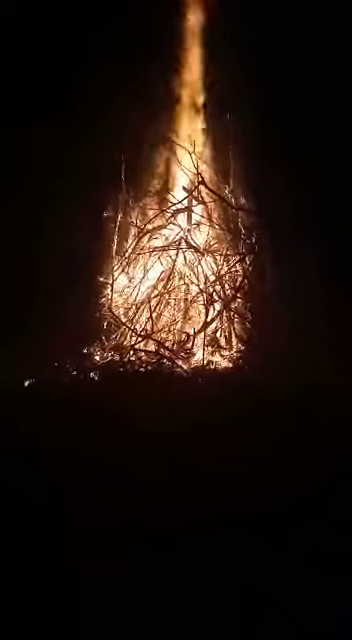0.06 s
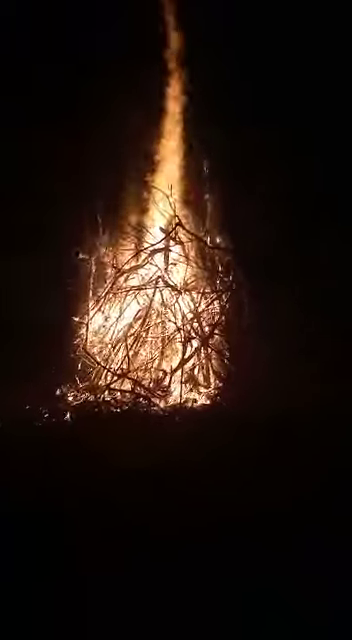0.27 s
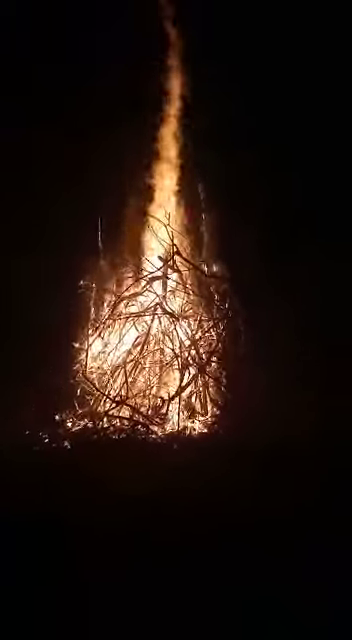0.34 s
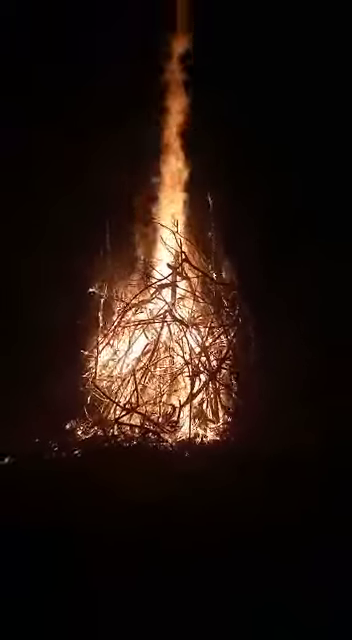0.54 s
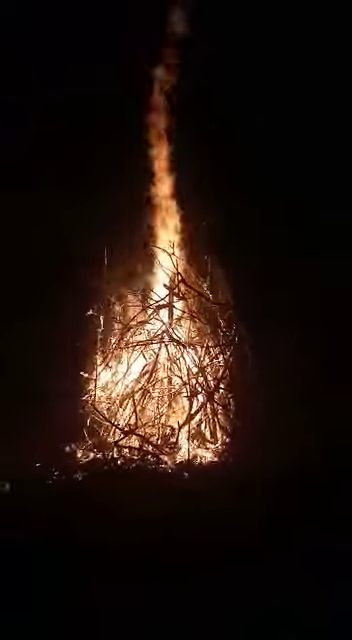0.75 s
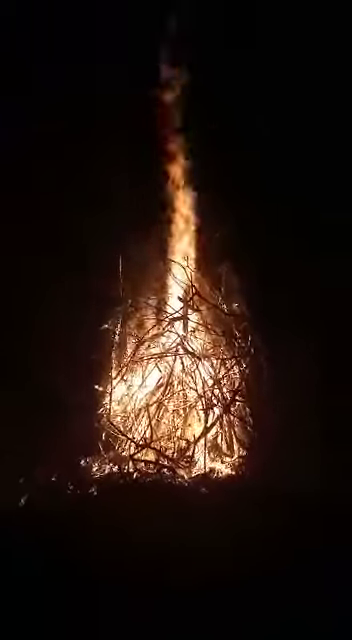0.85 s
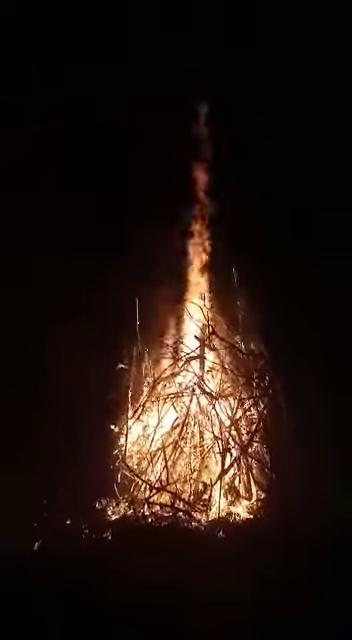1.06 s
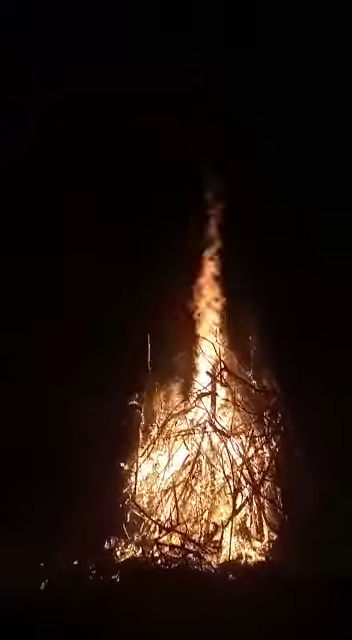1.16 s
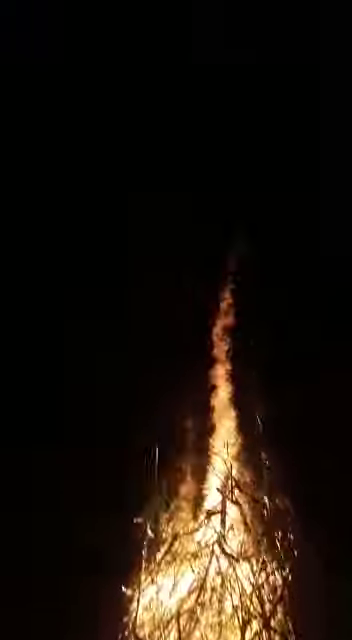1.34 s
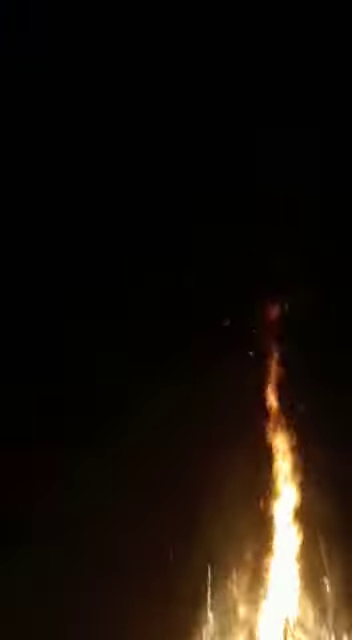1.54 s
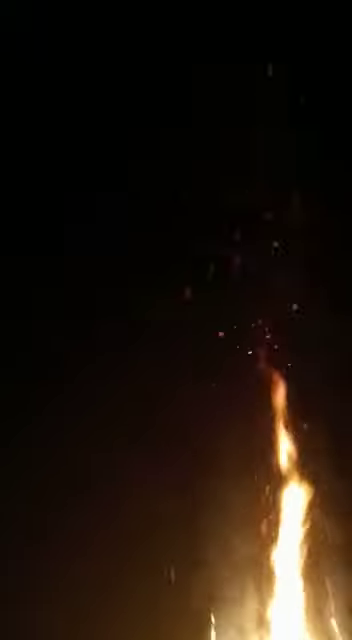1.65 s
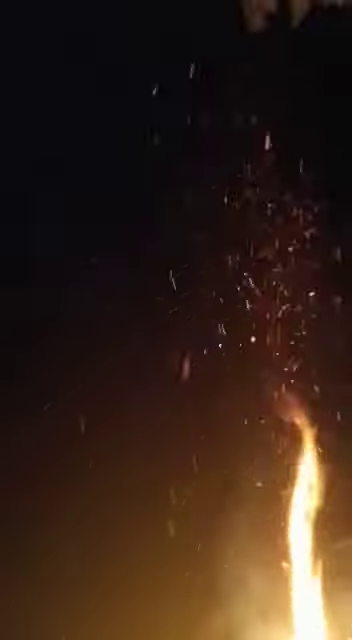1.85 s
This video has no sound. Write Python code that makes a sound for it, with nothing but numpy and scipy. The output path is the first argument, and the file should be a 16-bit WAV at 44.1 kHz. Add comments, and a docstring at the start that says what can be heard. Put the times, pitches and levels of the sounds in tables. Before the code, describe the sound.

Brushwood fire crackling outdoors, briefly muffled by microphone handling, then bright with dense snapping twigs

```python
"""A brushwood bonfire burns: flames rumble, damp wood sizzles and twigs snap.
Early on, rubs and knocks on the microphone thump and scrape, and covering it dulls the fire.
Sap spits in short jets; later, steam squeezes out of the wood in two faint whistles.
Flames and hiss are coloured noise, snaps and spits are shaped ringing bursts, whistles are wavering
narrow bands; rubs are two noises under one envelope and knocks are short decaying sines."""
import sys
import numpy as np
from scipy import signal
from scipy.fft import rfft, irfft
from scipy.io import wavfile
from scipy.ndimage import uniform_filter1d

SR = 44100
rng = np.random.default_rng(int(sys.argv[2]) if len(sys.argv) > 2 else 0)


def put_to_file(sound):
    """Save the sound as 16-bit audio at rate SR, in the file named by the first command-line argument."""
    columns = np.atleast_2d(sound).T  # one column per channel
    safe = np.clip(columns, -1, 1)
    whole_steps = np.round(safe * 32767)
    wavfile.write(sys.argv[1], SR, whole_steps.astype(np.int16))


N = 83790
TIME = np.arange(N) / SR
BURST_TIME = np.arange(2048) / SR
CRACK_BAND = signal.butter(3, [4600, 8600], "band", fs=SR)
BODY_BAND = signal.butter(2, [1500, 4000], "band", fs=SR)


def from_db(db):
    """Decibels to amplitude gain."""
    return 10 ** (np.asarray(db) / 20)


def rms_one(x):
    """Scale to unit rms."""
    return x / np.sqrt(np.mean(x ** 2) + 1e-20)


def in_time(rows):
    """Interpolate (time_s, value) rows to every sample."""
    return np.interp(TIME, *np.transpose(rows))


def filtered(x, hz, kind, order=2):
    """Butterworth filter."""
    sos = signal.butter(order, np.clip(hz, 10, .45 * SR), kind, fs=SR, output="sos")
    return signal.sosfilt(sos, x)


def noise(spectrum, size=N):
    """Unit-rms noise coloured by (frequency_hz, density_db) rows, interpolated over log frequency."""
    hz, db = np.transpose(spectrum)
    bin_hz = np.fft.rfftfreq(size, 1 / SR)
    gain = from_db(np.interp(np.log(bin_hz + 1), np.log(hz), db))
    return rms_one(irfft(rfft(rng.standard_normal(size)) * gain, size))


def drift(rate_hz):
    """Unit-rms random wander: white noise through a two-pole low-pass."""
    r = np.exp(-2 * np.pi * rate_hz / SR)
    wander = signal.lfilter([1], [1, -2 * r, r * r], rng.standard_normal(N + SR))
    return rms_one(wander[SR:])  # first second discarded: filter settling


def add(out, start_s, sound):
    """Mix a sound in at a time."""
    i = int(np.clip(start_s * SR, 0, N - 1))
    out[i:i + len(sound)] += sound[:N - i]


def flames():
    """Rumble of the flame column: bass-heavy noise with a fluttering level."""
    # flame colour: frequency_hz, density_db
    roar = [(25, -14), (45, -13.5), (70, 0.5), (105, 1), (170, -5.5), (260, -4.5), (400, -13.5), (600, -11),
            (780, -14), (950, -19.5), (1400, -20.5), (2200, -23.5), (4000, -29), (9000, -35)]
    level_db, flutter_db = -38.5, 1.5
    return noise(roar) * from_db(level_db + flutter_db * drift(24))


def hiss():
    """Sizzle of damp wood: treble noise with a fast flickering level."""
    # sizzle colour: frequency_hz, density_db
    sizzle = [(1500, -3.5), (2800, -2.5), (4300, -6), (5500, -1.5), (6600, 6), (8200, -3), (11000, -5.5),
              (16000, -5.5)]
    base_db, flutter_db = -46, 1.66
    return noise(sizzle) * from_db(base_db + flutter_db * drift(99))


def burst(envelope, length_s, ring_hz, body_db, edge_db):
    """Gas bursting from wood: ringing crack, woody body and bright edge, scaled for nominal length."""
    # bright edge colour: frequency_hz, density_db
    edge_colour = [(8000, -23), (10000, 3.5), (13000, 3.5), (20000, -4.5)]
    ring_width_hz, crack_db, body_trim_db, edge_trim_db = 1500, -4, -1.5, -8
    ring, crack, body = rng.standard_normal((3, len(BURST_TIME))) * envelope
    r = np.exp(-np.pi * ring_width_hz / SR)
    poles = [1, -2 * r * np.cos(2 * np.pi * ring_hz / SR), r * r]
    ring = rms_one(signal.lfilter([1, 0, -1], poles, ring))
    crack = rms_one(signal.lfilter(*CRACK_BAND, crack))
    body = rms_one(signal.lfilter(*BODY_BAND, body))
    edge = rms_one(noise(edge_colour, size=len(BURST_TIME)) * envelope)
    sound = rms_one(ring + from_db(crack_db) * crack)
    sound = sound + from_db(body_db + body_trim_db) * body
    sound = sound + from_db(edge_db + edge_trim_db) * edge
    return sound * np.sqrt(length_s / BURST_TIME[-1])


def snap(ring_hz, body_db, edge_db, fade_s):
    """One fracture: sudden onset, fast decay and a faint tail scattered by the pile."""
    tail_db, tail_s = -24, .004
    envelope = np.exp(-BURST_TIME / fade_s) + from_db(tail_db) * np.exp(-BURST_TIME / tail_s)
    return burst(envelope, .002, ring_hz, body_db, edge_db)


def crackles():
    """Small fractures at random times all through the pile, each with its own size and colour."""
    rate_per_s, floor_db, spread_db, range_db = 150, -48, 4.5, 12
    centre_hz, body_centre_db, edge_centre_db, fade_s = 7360, -15, -2, 0.00092
    out = np.zeros(N)
    for when, size, pitch, body, edge in rng.random((int(rate_per_s * N / SR), 5)):
        # exponential spread in dB: mostly small, few large
        db = floor_db + min(-spread_db * np.log(1 - size), range_db)
        ring_hz = centre_hz * 2 ** (.7 * (pitch - .5))
        body_db = body_centre_db + 12 * (body - .5)
        edge_db = edge_centre_db + 12 * (edge - .5)
        add(out, when * N / SR, from_db(db) * snap(ring_hz, body_db, edge_db, fade_s))
    return out


def snaps():
    """Twigs snapping: the loud single fractures."""
    # snaps, levels before trim, body and edge re level:
    # start_s, level_db, ring_hz, body_db, edge_db, fade_s
    snap_rows = [(0.0628, -31.5, 4770, 0.5, 8, 0.0024), (0.0851, -35, 8900, 0.5, 13, 0.00088),
                 (0.1107, -28.5, 4650, -3, 3, 0.0012), (0.5261, -42, 6000, 14, -20, 0.00041),
                 (0.5459, -32, 6100, -13, -20, 0.0005), (0.5545, -35.5, 5860, 6, -24, 0.0011),
                 (0.728, -23.5, 6430, -2, -27, 0.0005), (0.7469, -24.5, 6300, -11, -21, 0.00035),
                 (0.7635, -20.5, 6040, -7.5, -22, 0.0022), (0.8272, -46, 5800, 8, -15, 0.00067),
                 (0.8765, -18.5, 7800, -37, 0, 0.0024), (0.8844, -31, 6340, -26, -18, 0.00057),
                 (0.9185, -36, 6600, -25, 13, 0.00043), (0.9414, -43, 6300, -22, 22, 0.0004),
                 (0.9531, -32, 6400, -12, -6, 0.00077), (0.989, -26, 6660, -5.5, 12.5, 0.00032),
                 (1.018, -22.5, 6700, -5.5, -12, 0.00061), (1.0741, -29.5, 6800, -21, 11.5, 0.00068),
                 (1.0943, -40, 7650, 2, 14, 0.0003), (1.1141, -33, 5870, -20, 5, 0.0004),
                 (1.1392, -23.5, 6440, -32, 7.5, 0.0016), (1.1579, -30, 6440, -1, -10, 0.0007),
                 (1.1785, -22.5, 6400, -21, 9, 0.0003), (1.208, -34, 6400, -3, 9, 0.0003),
                 (1.2571, -23, 7200, -9, 5, 0.00055), (1.3065, -28.5, 6600, -26, 7, 0.00054),
                 (1.3138, -29, 6900, -8, 6, 0.0014), (1.3301, -23.5, 9700, -29, -13, 0.00019),
                 (1.3518, -22.5, 7400, -10.5, -9, 0.0016), (1.3631, -25, 6950, -23, -15, 0.00043),
                 (1.4071, -19.5, 6900, -10.5, 4.5, 0.00028), (1.4361, -35, 5670, -18, -12, 0.0005),
                 (1.4424, -23, 9500, -22, -14, 0.00012), (1.5016, -30, 6640, -15, -1, 0.00021),
                 (1.5079, -31, 6240, -9, -11, 0.00048), (1.5146, -28.5, 8500, -7, -12, 0.00065),
                 (1.5296, -30, 7700, -23, -3, 0.0004), (1.5636, -24.5, 7750, -24, 5, 0.00065),
                 (1.57, -25.5, 7900, -24, -23, 0.0004), (1.6154, -26.5, 7850, -34, -1, 0.0006),
                 (1.6226, -30, 7600, -21, -3, 0.00054), (1.6409, -33.5, 8800, -5, 9, 0.0006),
                 (1.6876, -30, 8000, -5, -12, 0.0006), (1.7146, -25, 7800, -5.5, -13, 0.00098),
                 (1.739, -28.5, 7700, -3, 6, 0.00055), (1.7646, -33, 7750, -10, 8, 0.0015),
                 (1.8339, -25, 6860, -30, 1, 0.00026), (1.8447, -35, 7600, -20, 10, 0.00019)]
    trim_db = -4.05
    out = np.zeros(N)
    for start_s, db, ring_hz, body_db, edge_db, fade_s in snap_rows:
        add(out, start_s, from_db(db + trim_db) * snap(ring_hz, body_db, edge_db, fade_s))
    return out


def covered(x):
    """Covering the microphone: treble drops most, bass least, the topmost band on its own curve."""
    # cover depth: time_s, treble_loss_db
    cover = [(0, -1), (.22, -10), (.27, 44), (.3, 32), (.355, 34), (.375, 6), (.45, 36), (.5, 4.5),
             (.565, 21.5), (.59, 0), (1.9, -1)]
    # topmost treble, last to return: time_s, level_db
    top_level = [(0, -2.5), (.2, -0.5), (.26, -20), (.3, -39), (.355, -47), (.375, -41), (.5, -35),
                 (.57, -26), (.62, -7.5), (.72, -4.5), (.85, 0), (1.9, 1.5)]
    split_hz, bass_share, top_split_hz = 1620, 0.1, 6850
    loss_db = in_time(cover)

    def split(sound, hz, order):
        """Low and high bands, each filtered twice so that the halves align."""
        return [filtered(filtered(sound, hz, kind, order), hz, kind, order) for kind in ("low", "high")]

    bass, rest = split(x, split_hz, 2)
    treble, top = split(rest, top_split_hz, 4)
    out = bass * from_db(-bass_share * loss_db)
    out = out + treble * from_db(-loss_db)
    return out + top * from_db(in_time(top_level))


def with_ground(x):
    """Direct sound plus a duller ground reflection, its delay growing as the microphone moves."""
    # reflection path: time_s, delay_ms
    ground_delay = [(0, 1.52), (.7, 1.57), (1.3, 1.656), (1.9, 2.05)]
    share, cut_hz = 0.28, 3700
    dull = filtered(x, cut_hz, "low", order=1)
    echo = np.interp(TIME - in_time(ground_delay) / 1000, TIME, dull)
    return x + share * echo


def rubs():
    """Rubs on the microphone: low thud and grainy scrape under one envelope."""
    # rubs: start_s, attack_s, hold_s, release_s, thud_db, scrape_db
    rub_rows = [(0.173, 0.043, .004, .008, -31, -27), (0.22, 0.0063, 0.033, 0.021, -15.5, -18.5),
                (.366, 0.0022, 0.016, 0.012, -14.5, -23), (0.397, 0.0067, 0.035, 0.029, -17, -26),
                (0.459, 0.0057, 0.0057, .012, -21, -29), (0.563, 0.02, 0.0022, 0.0095, -22, -24.5)]
    # thud colour: frequency_hz, density_db
    thud_colour = [(25, -3), (60, -3.5), (120, 1.5), (220, -3), (350, -1.5), (540, -5.5), (750, -11.5),
                   (1100, -41), (2000, -26), (5000, -57.5)]
    # scrape colour: frequency_hz, density_db
    scrape_colour = [(200, 2.5), (500, -7), (900, 2.5), (1500, -3), (2200, -8), (3200, -17), (4700, -25),
                     (7000, -38.5), (12000, -102)]
    grain_db = 1.2
    out = np.zeros(N)
    thud = noise(thud_colour)
    scrape = rms_one(noise(scrape_colour) * from_db(grain_db * drift(110)))
    thud = thud / np.sqrt(uniform_filter1d(thud ** 2, size=700))  # evens out the running level
    for start_s, attack_s, hold_s, release_s, thud_db, scrape_db in rub_rows:
        rise = np.clip((TIME - start_s) / attack_s, 0, 1)
        fall_age = np.maximum(TIME - start_s - attack_s - hold_s, 0)
        envelope = rise * np.exp(-(fall_age / release_s) ** 2)
        out += envelope * (from_db(thud_db) * thud + from_db(scrape_db) * scrape)
    return out


def knocks():
    """Soft knocks on the microphone housing: fast-decaying low sines."""
    # knocks, level before envelope: start_s, level_db, pitch_hz
    knock_rows = [(.284, -9.5, 111), (.326, -16.5, 104), (0.378, -4, 65), (.408, -6, 67.4),
                  (.471, -9.5, 89), (0.588, -10.5, 58.4)]
    fade_s, attack_s = 0.0059, 0.0019
    out = np.zeros(N)
    for start_s, db, hz in knock_rows:
        age = np.maximum(TIME - start_s, 0)
        envelope = (1 - np.exp(-age / attack_s)) * np.exp(-age / fade_s)
        out += from_db(db) * envelope * np.sin(2 * np.pi * hz * age)
    return out


def spits():
    """Jets of sap: bursts that hold for some milliseconds, then die."""
    # jets, level before trim, edge re level: start_s, length_s, level_db, edge_db
    spit_rows = [(.588, .018, -33, -22), (.6305, .01, -28, -16), (.708, .007, -37, -6),
                 (.985, .01, -31, -5), (1.016, .01, -29, -12), (1.074, .007, -33, -3),
                 (1.443, .008, -37, -4), (1.467, .007, -34, -8), (1.479, .005, -35, -5),
                 (1.566, .011, -32, -5), (1.583, .012, -36, 7)]
    trim_db, ring_hz, body_db, release_s = 1, 6300, -15, .0015
    out = np.zeros(N)
    for start_s, length_s, db, edge_db in spit_rows:
        envelope = np.exp(-np.maximum(BURST_TIME - length_s, 0) / release_s)
        add(out, start_s, from_db(db + trim_db) * burst(envelope, length_s, ring_hz, body_db, edge_db))
    return out


def whistles():
    """Steam through a crack: a narrow, wavering band that glides up, swells and fades."""
    # whistles: start_s, length_s, pitch_hz, rise_hz, level_db
    whistle_rows = [(1.16, 0.096, 1338, 7.1, -43.5), (1.66, 0.257, 2400, 127.4, -44.5)]
    width_hz, waver = 110, .025  # waver: rms fraction of pitch
    out = np.zeros(N)
    for start_s, length_s, hz, rise_hz, db in whistle_rows:
        progress = np.clip((TIME - start_s) / length_s, 0, 1)
        pitch_hz = (hz + rise_hz * progress) * (1 + waver * drift(13.3))
        phase = 2 * np.pi * np.cumsum(pitch_hz) / SR
        band = drift(width_hz) * np.sin(phase) + drift(width_hz) * np.cos(phase)
        swell = np.sqrt(np.abs(np.sin(np.pi * progress)))
        out += from_db(db) * swell * band
    return out


def scene():
    """Fire heard through the cover, snaps past it, ground reflection, then microphone handling; mono."""
    # liveliness of hiss and crackles: time_s, gain_db
    vigour = [(0, -1.5), (.14, -3), (.2, 0.5), (.6, 12), (.66, 2), (.8, 2.5), (1.05, 3), (1.23, 2.5),
              (1.275, -5), (1.32, 0.5), (1.6, -0.5), (1.9, -1.5)]
    bed = flames() + whistles() + from_db(in_time(vigour)) * (hiss() + crackles())
    fire = covered(bed + spits()) + snaps()
    return (with_ground(fire) + rubs() + knocks())[None]


def record(dry):
    """Microphone: port resonance lifts the very top; deepest bass and all above the cut-off go."""
    port_hz, port_width_hz, port_db = 15150, 1300, 9
    low_cut_hz, cutoff_hz = 58, 15750
    port = filtered(dry, [port_hz - port_width_hz / 2, port_hz + port_width_hz / 2], "band")
    coloured = filtered(dry + from_db(port_db) * port, low_cut_hz, "high")
    return signal.sosfilt(signal.ellip(10, .5, 70, cutoff_hz, fs=SR, output="sos"), coloured)


dry = scene()
out = record(dry)
put_to_file(out)
```